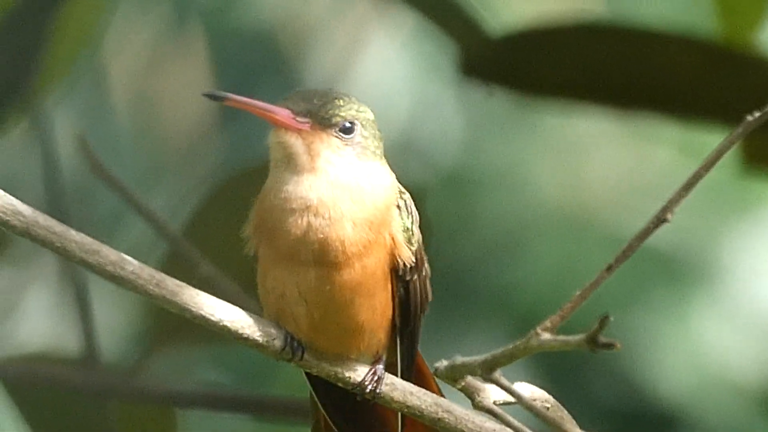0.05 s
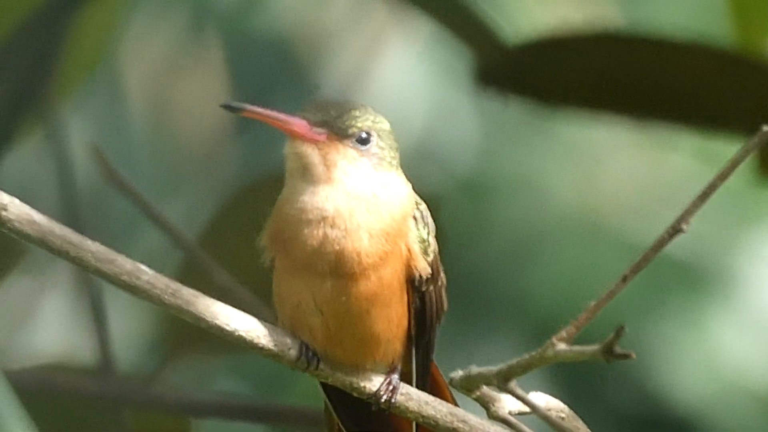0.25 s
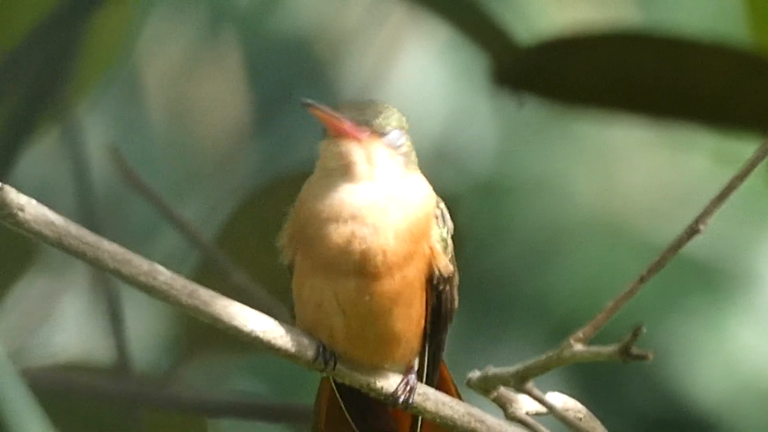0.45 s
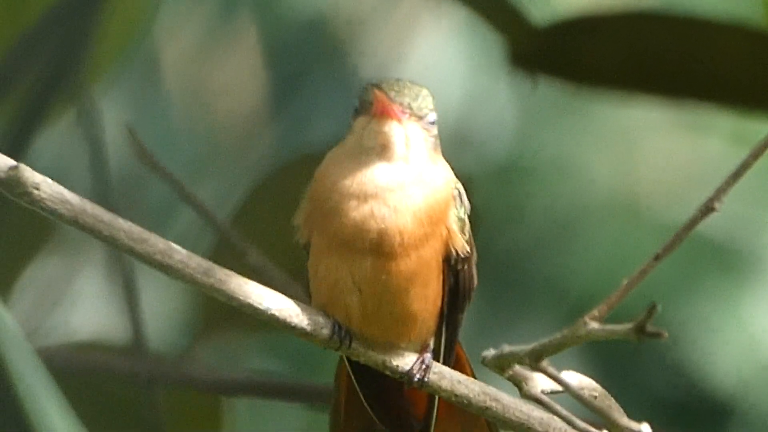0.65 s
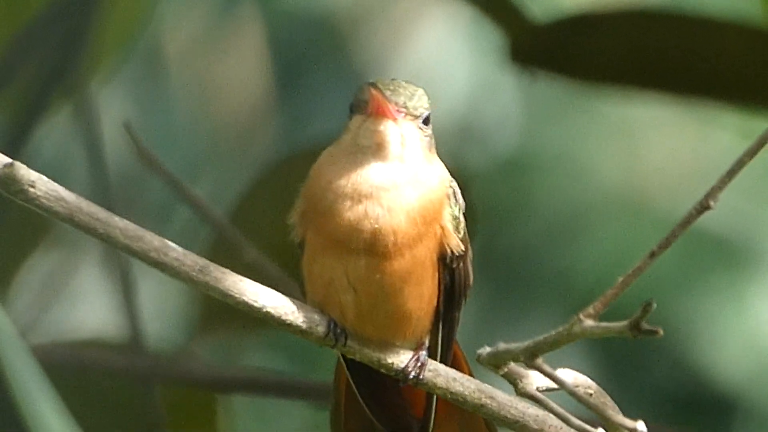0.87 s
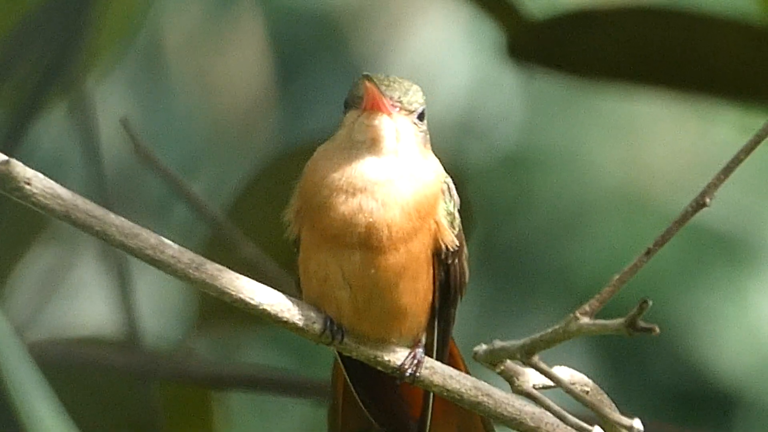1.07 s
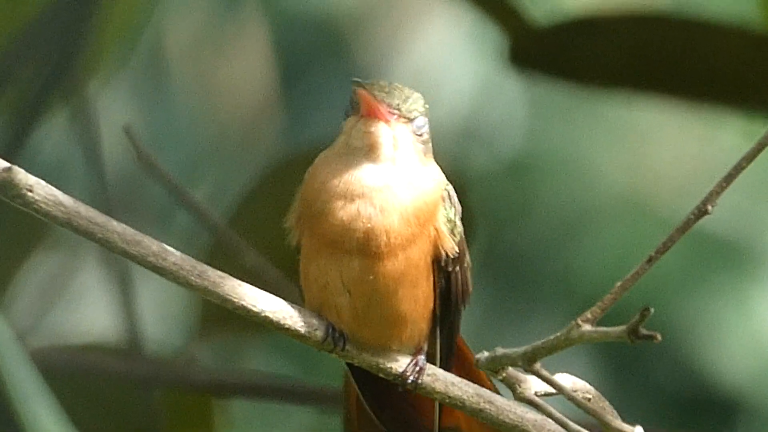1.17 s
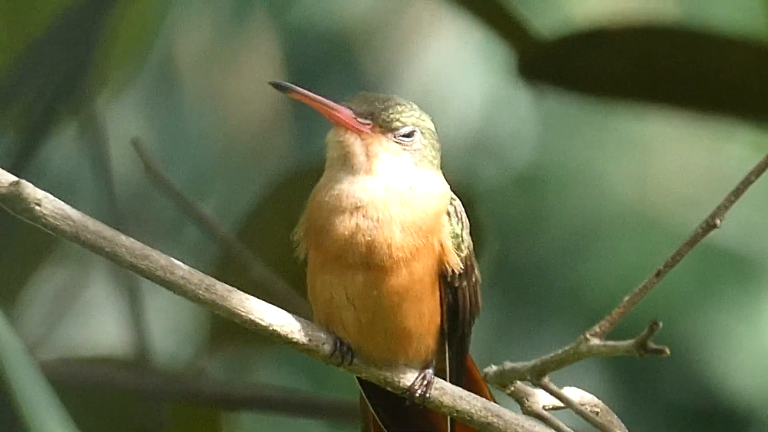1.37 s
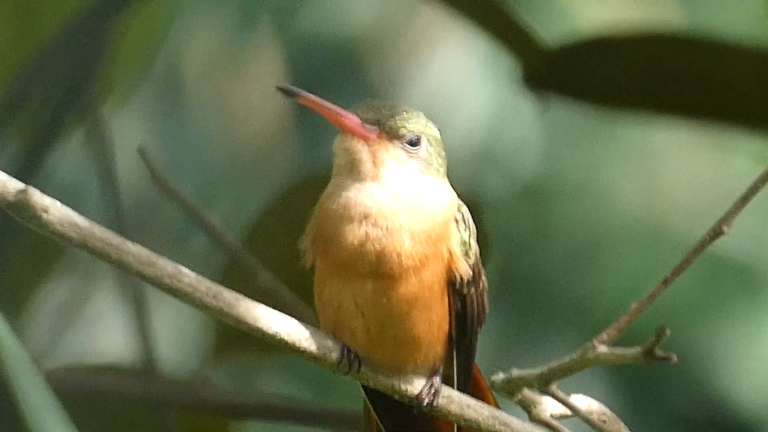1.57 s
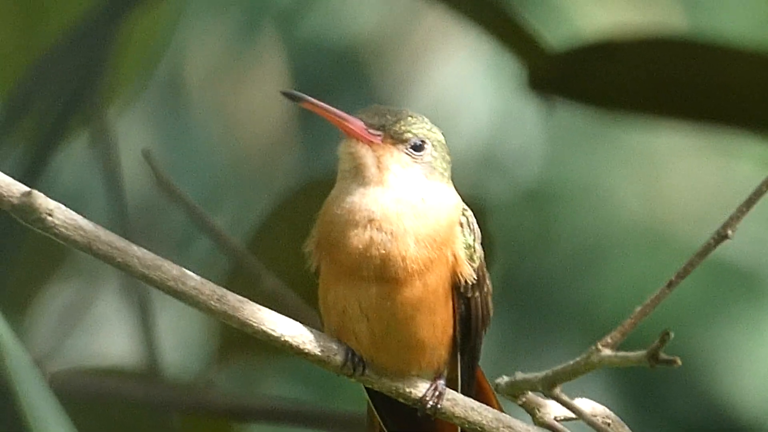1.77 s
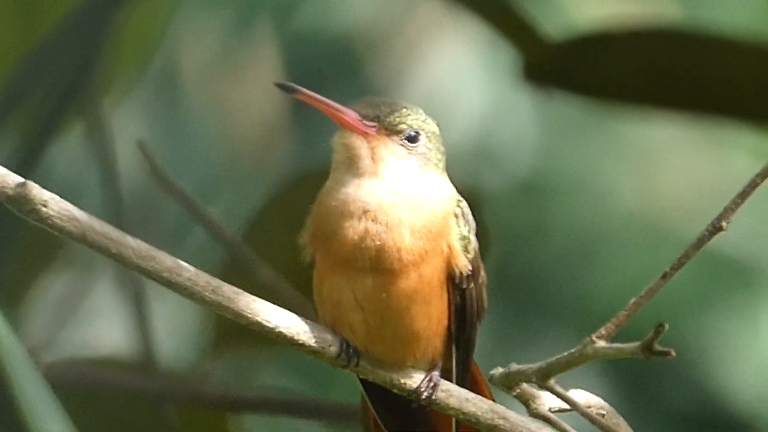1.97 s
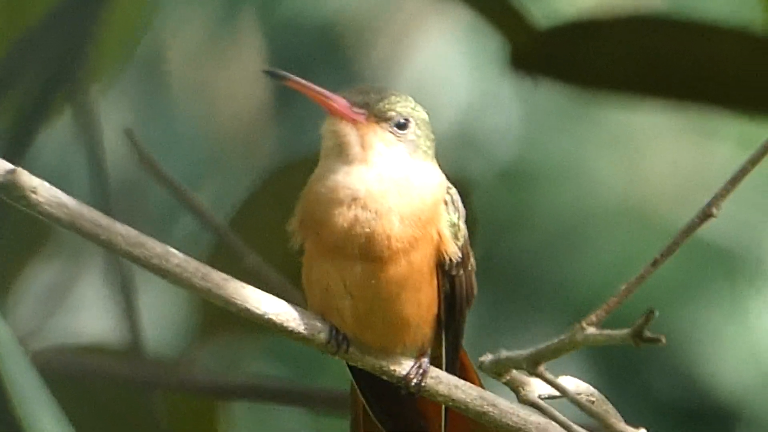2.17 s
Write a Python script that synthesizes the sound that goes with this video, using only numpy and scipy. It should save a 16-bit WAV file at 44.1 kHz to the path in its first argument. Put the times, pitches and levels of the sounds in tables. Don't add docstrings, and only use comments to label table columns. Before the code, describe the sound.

From about 0.1 to 0.4 seconds a small bird gives one harsh, high squawk: it starts softly, rises quickly, is loudest near 0.25, then roughens into buzzy pulses and airy rasp. A short echo from leaves and trunks fades quickly. Beneath throughout, a distant stream rumbles low and wide, with very faint high insect buzz. Soft hollow gurgles come near 0.2, 1.7-1.8 and 2.1-2.2 seconds.

```python
import sys
import numpy as np
from scipy import signal
from scipy.fft import rfft, irfft, next_fast_len
from scipy.io import wavfile
from scipy.ndimage import uniform_filter1d

SR = 44100
rng = np.random.default_rng(int(sys.argv[2]) if len(sys.argv) > 2 else 0)


def gain_from_decibels(decibels):
    exponent = np.asarray(decibels, float) / 20
    return 10 ** exponent


def transcribe(signal):
    frames = np.atleast_2d(signal).T
    limited = np.clip(frames, -1, 1)
    pcm = np.round(limited * 32767).astype(np.int16)
    wavfile.write(sys.argv[1], SR, pcm)


N = 98078
FAST = next_fast_len(N)
JITTER_HZ, SHIMMER_DB, SHIMMER_HZ = 500, 3, 260


def read(table, hz):
    f, v = np.array(table, float).T
    return np.interp(np.log(np.maximum(hz, 1)), np.log(np.maximum(f, 1)), v)


def unit(x):
    return x / np.sqrt(np.mean(x ** 2))


def bin_hz():
    return np.arange(FAST // 2 + 1) * SR / FAST + 1


def peak(x, hz, width):
    f = bin_hz()
    off_centre = (f - hz * hz / f) / (2 * width)
    return irfft(rfft(x, FAST) / (1 + off_centre ** 2) ** 2, FAST)[:N]


def walk(rate):
    k = int(SR / rate)
    steps = np.repeat(rng.standard_normal(N // 20), k)[:N]
    return unit(uniform_filter1d(uniform_filter1d(steps, k), k))


def wide(mid, side):
    return np.array([mid + side, mid - side])


def stream(t):
    # f/Hz, level/dB
    rush_tone = [(60, -29), (110, -10.5), (200, 0), (400, -7), (850, -14.5), (1100, -17), (7800, -40),
                 (15400, -43)]
    # f/Hz, side minus mid/dB
    side_share = [(60, -9), (110, -5.5), (200, -10), (380, -3.5), (700, -3), (1290, -1.5), (2380, -3),
                  (4390, -8), (8110, -4.5), (15000, -1.5)]
    # t/s, level/dB
    flow = [(0, 0), (.4, 1), (1, 0), (1.5, -1.06), (2.22, -1.35)]
    # f/Hz, width/Hz, level/dB
    hollows = [(78.3, 4, -67.5), (118.4, 18.6, -59), (187, 23, -54), (274.3, 51, -54), (332, 12, -56),
               (700, 230, -54.5), (2590, 2050, -64)]
    rush_db, flicker_db, flicker_hz = -43, -0.6, 4.8
    f = bin_hz()
    mid, side = rfft(rng.standard_normal((2, FAST))) * gain_from_decibels(read(rush_tone, f))
    both = wide(mid, side * gain_from_decibels(read(side_share, f)))
    rush = 0
    for hz in 25 * 2 ** np.arange(0, 10, .5):
        band = np.cos(np.pi * np.clip(np.log2(f / hz), -.5, .5)) ** 2
        rush = rush + irfft(both * band, FAST)[:, :N] * gain_from_decibels(flicker_db * walk(flicker_hz))
    out = unit(rush) * gain_from_decibels(rush_db)
    for hz, width, db in hollows:
        mid, side = (unit(peak(n, hz, width)) for n in rng.standard_normal((2, N)))
        out = out + gain_from_decibels(db) * wide(mid, side * gain_from_decibels(read(side_share, hz)))
    return out * gain_from_decibels(np.interp(t, *np.array(flow).T))


def gurgles(t):
    # t/s, length/s, f/Hz, width/Hz, level/dB
    swells = [
        (1.725, 0.015, 647, 40, -43.5),
        (1.794, 0.085, 700, 350, -47),
        (1.796, 0.046, 327, 30, -48),
        (2.11, 0.03, 837, 40, -50),
        (2.19, 0.094, 694, 151, -50.5),
        (0.225, 0.096, 240, 80, -43.5),
    ]
    side_db = -12
    out = 0
    for s, length, hz, width, db in swells:
        shape = np.exp(-((t - s) / length) ** 2)
        mid, side = (shape * peak(n, hz, width) for n in rng.standard_normal((2, N)))
        even = np.sqrt(np.sum(shape ** 2) / np.sum(mid ** 2))
        out = out + gain_from_decibels(db) * wide(mid, gain_from_decibels(side_db) * side) * even
    return out


def insects(t):
    # f/Hz, width/Hz, level/dB, throbs per second/Hz
    buzzes = [
        (6955, 54, -70.5, 68),
        (7297, 78, -72.5, 60),
        (6350, 79, -78, 84),
        (6510, 690, -70.5, 90),
    ]
    throb_depth, swell_db, side_db = .45, 1.2, -7
    out = 0
    for hz, width, db, rate in buzzes:
        stroke = np.sin(2 * np.pi * rate * t + walk(8.1))
        throb = (1 + throb_depth * stroke) * gain_from_decibels(swell_db * walk(5))
        mid, side = (unit(peak(n * throb, hz, width)) for n in rng.standard_normal((2, N)))
        out = out + gain_from_decibels(db) * wide(mid, gain_from_decibels(side_db) * side)
    return out


def second_side(t):
    # t/s, level/dB
    strength = [(0.141, -54), (.175, -37.5), (.24, -52.5), (.27, -62), (.3, -43), (0.349, -51.5),
                (.38, -80)]
    # multiple of the pitch, level/dB
    multiples = [(2.45, -6), (4, -17), (5, -1), (6, -15), (7, -2)]
    # t/s, length/s, f/Hz, level/dB
    catch = (.113, .012, 1600, -50)
    pitch_hz, jitter = 471.3, 0.0087
    s, db = np.array(strength).T
    on = (t > s[0]) * (t < s[-1])
    turn = np.cumsum(pitch_hz * (1 + jitter * walk(JITTER_HZ))) / SR
    lines = 0
    for k, line_db in multiples:
        lines = lines + gain_from_decibels(line_db + SHIMMER_DB * walk(SHIMMER_HZ)) * np.sin(2 * np.pi * k * turn)
    at, length, hz, creak_db = catch
    creak = gain_from_decibels(creak_db) * np.exp(-((t - at) / length) ** 2) * np.sin(2 * np.pi * hz * t)
    return np.sqrt(2) * (on * gain_from_decibels(np.interp(t, s, db)) * lines + creak)


def squawk(t):
    # t/s, pitch f/Hz, effort level/dB, half-pitch level/dB, rasp level/dB
    course = [
        (0.103, 890.3, -63, -19, -6),
        (.128, 928, -40, -17, -18),
        (.16, 1048, -42, -10, -0.5),
        (0.194, 1092, -35, -41, -8),
        (.232, 1086, -31.5, -20, -13),
        (0.266, 1048, -32, -19, -5.5),
        (0.294, 1046, -36.5, -0.5, 3.5),
        (.335, 1019, -50, 9, 11.5),
        (0.386, 979, -56.5, -18, 8),
    ]
    # f/Hz, level/dB
    throat = [(500, -17), (1050, -12.5), (1550, -8.5), (2130, 2), (2650, -8), (3200, -4.5), (3700, -22),
              (4250, -21.5)]
    # f/Hz, width/Hz, level/dB
    rasp_rings = [(1010, 95, 7), (1470, 180, -2.5), (2340, 930, 4.5), (3180, 770, -1.5), (4070, 240, -5),
                  (5600, 650, 0.5), (6350, 290, -6.5), (6740, 430, -6.5), (7400, 470, -19.5),
                  (8690, 590, -13), (10800, 1200, -28), (14600, 400, -25)]
    jitter = .013
    flutter_hz, flutter_pitch, flutter_depth = 106, .022, .12
    puff = 0.62
    s, hz, db, half_db, rasp_db = np.array(course).T
    on = (t > s[0]) & (t < s[-1])
    hz = np.interp(t, s, hz)
    flutter = np.sin(2 * np.pi * flutter_hz * t + .5 * walk(40))
    turn = np.cumsum(hz * (1 + jitter * walk(JITTER_HZ) + flutter_pitch * flutter)) / SR
    voice = 0
    for k in range(1, 10):
        gain_db = read(throat, hz * k / 2) + (k % 2) * np.interp(t, s, half_db)
        gain_db = gain_db + SHIMMER_DB * walk(SHIMMER_HZ)
        voice = voice + np.sqrt(2) * gain_from_decibels(gain_db) * np.sin(np.pi * k * turn + k * k)
    air = unit(rng.standard_normal(N) * np.exp(-(turn % 1) / puff))
    rasp = unit(sum(gain_from_decibels(ring_db) * peak(air, f, w) for f, w, ring_db in rasp_rings))
    effort = on * gain_from_decibels(np.interp(t, s, db)) * (1 + flutter_depth * flutter)
    return effort * (voice + gain_from_decibels(np.interp(t, s, rasp_db)) * rasp)


def forest(x, t):
    t60_s, gap_s = 0.31, 0.0045
    echo_db, side_db = -6, -5
    fade = gain_from_decibels(-60 * t / t60_s) * (t > gap_s)
    echoes = fade * rng.standard_normal((2, N))
    mid, side = (signal.fftconvolve(x, h / np.sqrt(np.sum(h ** 2)))[:N] for h in echoes)
    return wide(x + gain_from_decibels(echo_db) * mid, gain_from_decibels(echo_db + side_db) * side)


def scene():
    t = np.arange(N) / SR
    bird = squawk(t) + second_side(t)
    return stream(t) + insects(t) + gurgles(t) + forest(bird, t)


def low_pass(x):
    return signal.sosfilt(signal.butter(12, 15580, fs=SR, output="sos"), x)


def record(dry):
    bass_cut_hz, top_hz, lean_db = 42, 15450, -.6
    x = signal.sosfilt(signal.butter(2, bass_cut_hz, "high", fs=SR, output="sos"), dry)
    x = signal.sosfilt(signal.ellip(8, .2, 60, top_hz, fs=SR, output="sos"), x)
    x = x * gain_from_decibels(np.array([[lean_db], [-lean_db]]) / 2)
    return low_pass(x)


dry = scene()
out = record(dry)
transcribe(out)
```